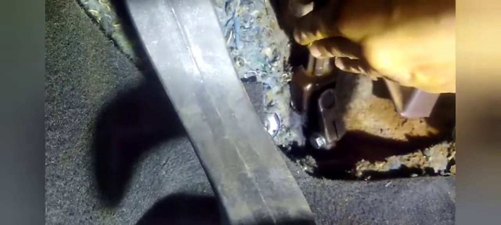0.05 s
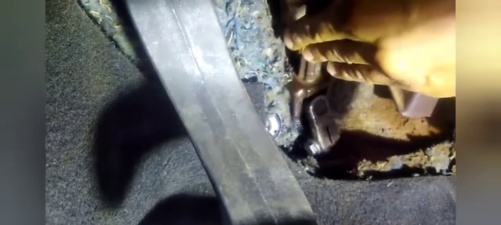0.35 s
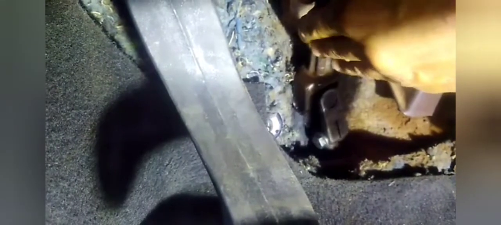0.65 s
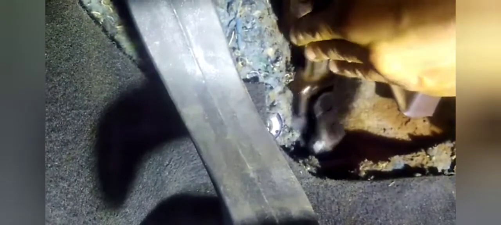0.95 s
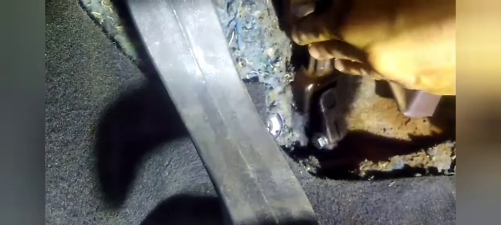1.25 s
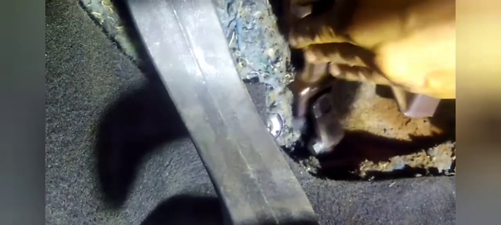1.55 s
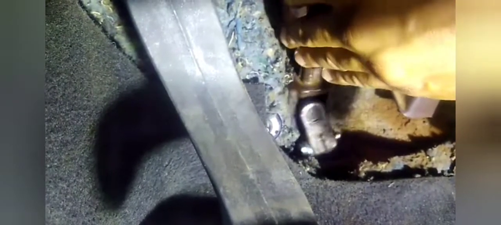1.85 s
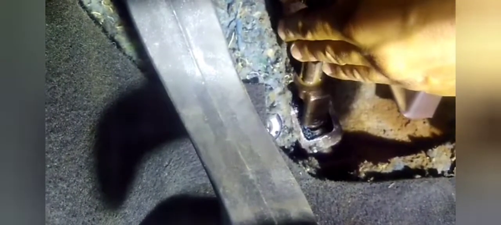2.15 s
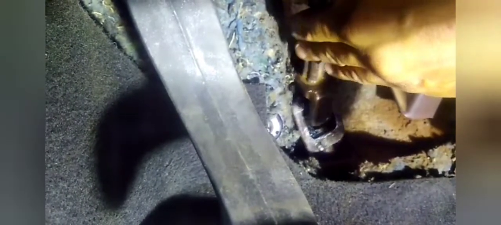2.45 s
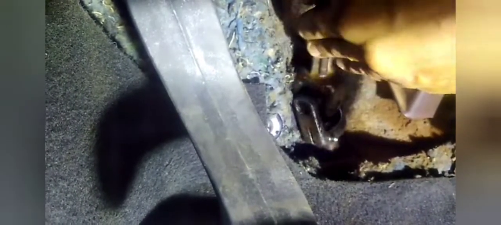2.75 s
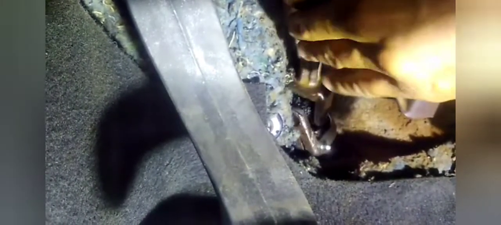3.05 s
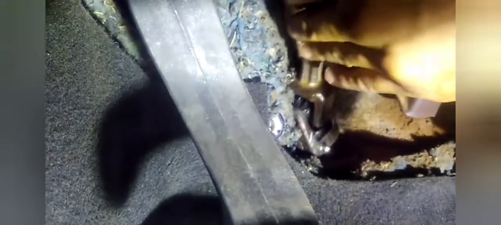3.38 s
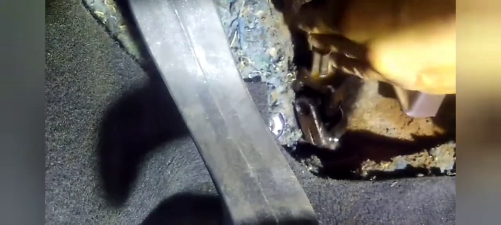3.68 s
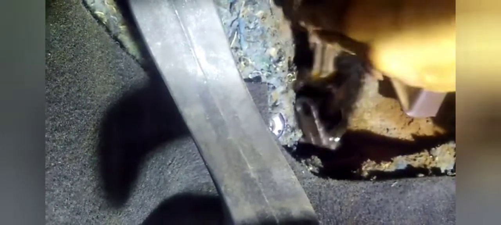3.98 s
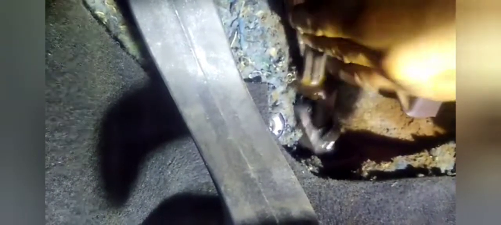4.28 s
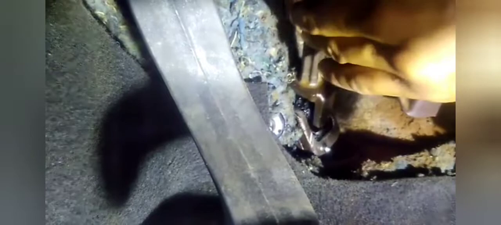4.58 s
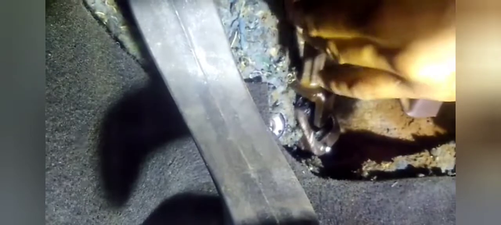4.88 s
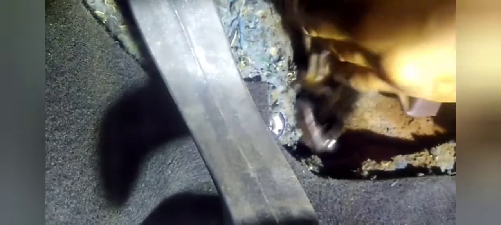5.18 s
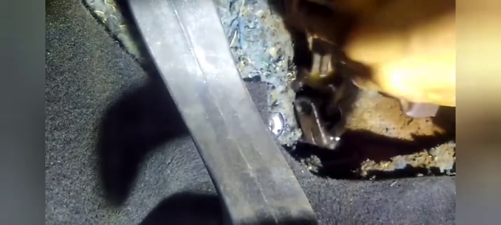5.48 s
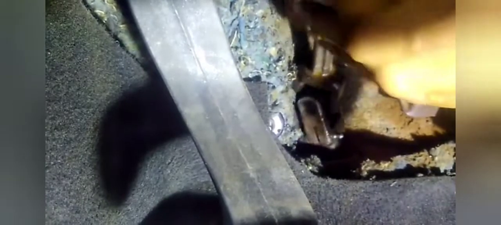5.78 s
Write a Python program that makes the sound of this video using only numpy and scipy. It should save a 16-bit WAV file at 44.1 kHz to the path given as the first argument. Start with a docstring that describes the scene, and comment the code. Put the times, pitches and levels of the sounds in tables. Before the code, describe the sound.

A worn steering box is rocked back and forth, heard close up in a car's footwell with a low cabin rumble throughout. For the first three seconds, dull, uneven knocks come roughly three times a second, each with a deep, slightly bouncing thump from the floor. The shaft rubs faintly between them, the linkage gives a tiny squeak near 2.2 seconds, and the trim creaks quietly around 2.5 seconds. From about 3 seconds the knocks grow harder and quicker, with bright metallic clacks and slight rattles from the column joint. They are loudest between 3.7 and 5 seconds, about five or six a second, alternating sharp cracks with hollower clunks, while the rumble swells a little. After about 5.3 seconds they soften into dull thumps again, with a brief faint squeak near 5.8 seconds.

```python
"""Dull knocks over a low cabin rumble: a worn steering box is rocked to and fro in a car's footwell.
At each reversal the gears cross their play and clunk, the column joint clacks a few ms later,
and the floor pan thumps and rebounds. The knocks grow hard and bright midway, then soften again.
Between them the shaft rubs in its bush; now and then the linkage squeaks faintly, and once the
trim creaks."""
import sys
import numpy as np
from scipy import signal
from scipy.fft import rfft, irfft
from scipy.io import wavfile
from scipy.ndimage import uniform_filter1d

SR = 44100
rng = np.random.default_rng(int(sys.argv[2]) if len(sys.argv) > 2 else 0)


def generate_wav(sig):
    """Save sig (samples, or channels by samples) to the path in sys.argv[1] as 16-bit PCM at SR."""
    pcm = np.round(np.clip(np.atleast_2d(sig).T, -1, 1) * 32767).astype(np.int16)
    wavfile.write(sys.argv[1], SR, pcm)


N = 261513
T = np.arange(N) / SR
FFT_SIZE = 16384
HZ = np.maximum(np.arange(FFT_SIZE // 2 + 1) * SR / FFT_SIZE, 1)

# likeness of left and right in the footwell: frequency_hz, correlation
COHERENCE = [(90, 1), (170, 1), (260, 0.41), (650, 0.8), (1000, 0.087), (3000, -0.11), (12000, 0.75)]
# load on the shaft, as a relative sound level: time_s, load_db
SHAFT_LOAD = [(0.0, -68), (1.02, -68.5), (1.52, -68), (1.93, -65.5), (2.94, -67.5), (4.14, -59),
              (5.63, -66.5), (5.76, -62.5), (5.93, -67)]
# spectra of the noises: frequency_hz, level_db
CABIN_RUMBLE = [(20, -31), (32, -23), (45, -42.5), (54, 12.5), (62, 14), (73, 2.5), (100, 0.5), (140, 2),
                (190, -29.5), (300, -54)]
FLOOR_SHUDDER = [(60, -30.5), (100, 6.5), (130, 3), (180, -21), (260, -12.5), (420, -42.5)]
AIR_HISS = [(1000, 19.5), (2500, -10), (4000, 7), (5500, 3), (7500, 6), (10000, -28), (15300, -22)]
SHAFT_GROAN = [(100, -13), (190, 14.5), (280, -4), (450, -2.5), (750, -5.5), (1200, -10), (2300, -14),
               (3300, -25.5), (6000, -32)]
BUSH_RUB = [(1200, 2.5), (2400, 0), (3500, -0.5), (5500, -2), (7800, -1), (9500, -4), (15000, -18)]
TRIM_SPECTRUM = [(120, -15), (170, 1), (205, 8.5), (250, -1), (320, -12.5), (900, -52)]
# swell of the trim's creak: time_s, level_db
TRIM_ENVELOPE = [(2.40, -69), (2.46, -49), (2.50, -42.5), (2.56, -45), (2.66, -82)]
# the shaft scraping in its bush: crest_s, half_length_s, level_db
BUSH_SCRAPES = [(1.903, 0.12, -68), (2.046, 0.031, -61.5), (2.553, 0.073, -66), (2.87, 0.081, -74),
                (5.92, 0.13, -69.5)]
# dry linkage squeaking: crest_s, half_length_s, pitch_hz, level_db
LINKAGE_SQUEAKS = [(0.495, 0.032, 2720, -71), (2.191, 0.026, 680, -57.5), (5.802, 0.018, 1366, -55),
                   (5.808, 0.02, 2340, -65), (5.83, 0.016, 1396, -46.5)]

# response of the body panels to a clunk: frequency_hz, gain_db
PANEL_RESPONSE = [(20, -23), (33, 2), (48, 1.5), (75, 10.5), (115, -14), (145, 13), (180, 1), (240, 3.5),
                  (440, -6), (750, -17), (1300, -33.5), (3000, -54)]
# hollow ring of the casing on the way back: pitch_hz, level_db, t60_s
CASING_MODES = [(435.6, -12, 0.16), (813, -10, 0.086), (908, -12, 0.075), (1019, -8, 0.085)]
# resonances of the column joint and of the box under each flank: frequency_hz, width_hz, level_db
JOINT_RESONANCES = [(3540, 210, 9.5), (4330, 130, -16), (4870, 170, -5), (5070, 180, -22), (5400, 110, -2),
                    (5950, 280, -9), (6800, 240, 10.5), (6800, 96, -12), (6900, 170, 8), (8000, 240, -25),
                    (7290, 150, 13.5), (7960, 660, 9.5)]
BOX_FORWARD_RESONANCES = [(239, 8.9, 12.5), (342, 8.5, 7.5), (418, 84, 5.5), (517, 20, 7), (658, 173, 5.5),
                          (770, 23, -27), (1355, 120, -3.5), (1770, 23, -42), (1810, 42, -22),
                          (2460, 230, -6.5), (2950, 20, -42)]
BOX_BACK_RESONANCES = [(294, 39, 10.5), (417, 35, 7), (482, 38, 7.5), (796, 123, 8.5), (990, 70, -19),
                       (950, 23, 4), (1260, 48, -32), (1870, 60, -3.5), (2270, 160, -5), (2500, 33, -66)]
# their beds of dense modes, for each direction of turn: frequency_hz, level_db
JOINT_FORWARD_BED = [(2800, -6), (4000, -20), (5000, 0.5), (6500, -6.5), (8200, 3), (8900, -21),
                     (11000, -11.5), (13000, -19), (15500, -18)]
JOINT_BACK_BED = [(2800, 4), (4200, 8), (6000, 5.5), (7500, 10.5), (9000, 2.5), (11000, -5.5), (13000, -10),
                  (15500, -43)]
BOX_FORWARD_BED = [(150, -4), (300, -6), (480, -33.5), (800, -1), (1000, -14), (1200, -32), (1500, -11),
                   (2500, -19.5), (3400, -18)]
BOX_BACK_BED = [(150, -8), (300, -2), (560, 2.5), (1000, -25), (1450, -8), (2200, -26), (3400, -11)]
# where joint and box sit between the ears: frequency_hz, left_minus_right_db
JOINT_BALANCE = [(2500, 13.5), (4300, -6), (5200, -8), (6300, -14.5), (7200, -11), (8200, -6), (9200, -3.5),
                 (14000, 0)]
BOX_BALANCE = [(200, -1), (700, 0), (1100, 0), (1450, -5), (1850, 0), (2400, -6), (3200, -4)]

# slack teeth nudging each other softly: start_s, level_db
TOOTH_NUDGES = [(1.483, -40.5), (2.961, -43.5), (4.386, -37.5), (5.107, -41), (5.304, -41), (5.429, -32.5)]
# wheel turned forward, the teeth slam and bounce once, the floor pan heaves:
# start_s, gear_db, hardness_db, joint_db, bounce_after_s, bounce_loss_db,
# floor_lag_s, floor_db, floor_pitch_hz, rebound_every_s, rebound_loss_db
FORWARD_SLAMS = [(0.002, -38.5, 0.5, -41, 0.021, 19, 0.017, -32.5, 134, 0.038, 22),
                 (0.519, -27.5, -37, -52, 0.064, 12, 0.026, -20.5, 114.5, 0.061, 10),
                 (1.168, -38, -23, -50.5, 0.047, -4, 0.073, -27.5, 115, 0.05, 16),
                 (1.876, -38, -19, -48, 0.089, 2, 0.03, -18, 101.7, 0.06, 5.5),
                 (2.425, -41, -22, -57, 0.06, 7, 0.02, -25, 102, 0.06, 3.5),
                 (2.794, -34.5, -6, -45, 0.018, 14, 0.0153, -26.5, 102.7, 0.032, 0.5),
                 (3.318, -22.5, 5.5, -20, 0.04, 27.5, 0.015, -19.5, 116, 0.05, 8.5),
                 (3.715, -17, 4, -12.5, 0.038, 17.5, 0.018, -18, 124, 0.048, 3.5),
                 (4.083, -17, 4.5, -11, 0.032, 12.5, 0.017, -18, 124, 0.049, 2),
                 (4.435, -17.5, 3.5, -11, 0.032, 18, 0.01764, -18.5, 123, 0.048, 2),
                 (4.796, -18, 4.5, -14, 0.024, 33, 0.017, -19.5, 124.5, 0.05, 3),
                 (5.166, -25.5, 0.5, -31, 0.024, 43, 0.027, -19.5, 106.8, 0.045, 6.5),
                 (5.497, -29, -5, -42, 0.007, 3.5, 0.03, -16, 102.7, 0.055, 6.5),
                 (5.856, -41.5, -11, -58, 0.021, 24, 0.0197, -36, 110, 0.05, 12)]
# wheel turned back, the other flank touches, slides and seats, the floor pan heaves:
# start_s, touch_db, slide_s, seating_db, hardness_db, joint_db,
# floor_lag_s, floor_db, floor_pitch_hz, rebound_every_s, rebound_loss_db
BACK_SEATINGS = [(0.255, -30, 0.018, -33.5, 0, -43, 0.015, -17, 111.3, 0.046, 5),
                 (0.916, -26, 0.024, -28.5, -10, -42, 0.0092, -18.5, 115.6, 0.047, 4),
                 (1.527, -28, 0.015, -29.5, -5.5, -47, 0.016, -17, 111.6, 0.056, 9),
                 (3.053, -33.5, 0.02, -22, 6, -22.5, 0.022, -19.5, 105.6, 0.029, -1),
                 (3.519, -37, 0.026, -25.5, 9.5, -22.5, 0.049, -20, 113.2, 0.063, 13),
                 (3.88, -32, 0.025, -21, 3, -24.5, 0.053, -21, 109.7, 0.04, 10),
                 (4.239, -32.5, 0.018, -19.5, 0.5, -21, 0.031, -19, 103, 0.062, 11),
                 (4.6, -33.5, 0.019, -21.5, 4.5, -23.5, 0.024, -21.5, 103, 0.0335, 2.5),
                 (4.953, -29.5, 0.02, -20, 0.5, -24.5, 0.033, -19.5, 106.4, 0.06, 5),
                 (5.336, -30, 0.023, -21, -2, -29, 0.042, -21.5, 109.6, 0.033, 3.5),
                 (5.661, -36, 0.026, -33, -22, -48.5, 0.023, -23.5, 98, 0.039, 5.5)]


def from_db(db):
    """Amplitude grows tenfold for every 20 dB."""
    return 10 ** (np.asarray(db) / 20)


def over_time(points):
    """Linear interpolation of a curve at every sample."""
    return np.interp(T, *np.transpose(points))


def over_hz(points):
    """Linear interpolation of a curve over log frequency."""
    hz, value = np.transpose(points)
    return np.interp(np.log(HZ), np.log(hz), value)


def drift(size, rate_hz):
    """Random modulation: unit Gaussian values joined by straight lines."""
    count = int(size * rate_hz / SR) + 2
    return np.interp(np.arange(size) * rate_hz / SR, np.arange(count), rng.standard_normal(count))


def add(track, start_s, sound):
    """Superposition: a short sound sums into a track."""
    i = max(round(start_s * SR), 0)
    track[..., i:i + sound.shape[-1]] += sound[..., :max(N - i, 0)]


def filtered(x, response):
    """A linear system convolves its input with its impulse response."""
    return signal.oaconvolve(np.atleast_2d(x), np.atleast_2d(response), axes=1)[:, :N]


def colour(x, gain):
    """Minimum-phase filtering: a causal response of the given shape, with unit gain for white noise."""
    half = FFT_SIZE // 2
    cepstrum = irfft(np.log(gain / np.sqrt(np.mean(gain ** 2)) + 1e-5))
    cepstrum[..., 1:half] *= 2
    cepstrum[..., half + 1:] = 0
    return filtered(x, irfft(np.exp(rfft(cepstrum)))[..., :half])


def spread(pair):
    """Partial coherence: two independent signals become left and right, most alike in the bass."""
    alike = np.clip(over_hz(COHERENCE), -.99, .995)
    mid, side = colour(pair, np.sqrt([1 + alike, 1 - alike]))
    return np.array([mid + side, mid - side]) / np.sqrt(2)


def noise(spectrum):
    """Spectral shaping of white noise gives a stereo noise of rms near 1."""
    return colour(spread(rng.standard_normal((2, N))), from_db(over_hz(spectrum)))


def under_load(light_db, db_per_db=1):
    """Power law: a gain that is light_db at light load and grows with the load on the shaft."""
    light_load_db = -66
    return from_db(light_db + db_per_db * (over_time(SHAFT_LOAD) - light_load_db))


def cabin_background():
    """Random vibration: cabin rumble and floor shudder follow the load, beneath a steady hiss of air."""
    rumble = under_load(-39, db_per_db=0.89) * noise(CABIN_RUMBLE)
    shudder = under_load(-51.5, db_per_db=0.57) * noise(FLOOR_SHUDDER)
    return rumble + shudder + from_db(-76) * noise(AIR_HISS)


def shaft_friction():
    """Sliding friction in the bush: an uneven groan that grows with load, and a gritty rub."""
    unevenness = from_db(2 * drift(N, rate_hz=60))
    grit = from_db(4 * drift(N, rate_hz=700))
    groan = under_load(-59) * unevenness * noise(SHAFT_GROAN)
    scrapes = sum(from_db(db) * np.exp(-((T - s) / half_s) ** 2) for s, half_s, db in BUSH_SCRAPES)
    rub = (from_db(-77) + scrapes) * grit * noise(BUSH_RUB)
    return groan + rub


def trim_creak():
    """Amplitude modulation: a low band of noise swells once as the pedal-box trim creaks."""
    db = over_time(TRIM_ENVELOPE)
    return from_db(db) * (db > db[0]) * noise(TRIM_SPECTRUM)


def linkage_squeaks(waver=0.039):
    """Stick-slip oscillation in the dry linkage gives short, unsteady tones that swell and fade."""
    out, t = np.zeros(N), T[:SR // 5] - .1
    for crest_s, half_s, hz, db in LINKAGE_SQUEAKS:
        pitch_hz = hz * (1 + waver * drift(len(t), rate_hz=450))
        envelope = from_db(db) * np.exp(-(t / half_s) ** 2)
        add(out, crest_s + t[0], envelope * np.sin(2 * np.pi * np.cumsum(pitch_hz) / SR))
    return out


def gear_contacts(nudge_t60=0.03, slam_t60=0.032, touch_t60=0.075, seating_t60=0.059):
    """Backlash lets the teeth collide. Rows: start_s, level_db, hardness_db, t60_s, joint_db, back."""
    rows = [(s, db, -26, nudge_t60, db - 26, 0) for s, db in TOOTH_NUDGES]
    for s, db, hardness_db, joint_db, bounce_s, loss_db, *_ in FORWARD_SLAMS:
        rows.append((s, db, hardness_db, slam_t60, joint_db, 0))
        edge_db = hardness_db + 2   # a bounce catches only the tooth edges
        rows.append((s + bounce_s, db - loss_db, edge_db, slam_t60, joint_db - 0.88 * loss_db, 0))
    for s, touch_db, slide_s, seating_db, hardness_db, joint_db, *_ in BACK_SEATINGS:
        touch = (0, touch_db, touch_t60)
        seat = (slide_s, seating_db, seating_t60)
        settle = (slide_s + 0.045, seating_db - 21, touch_t60)
        for after_s, db, t60 in (touch, seat, settle):
            rows.append((s + after_s, db, hardness_db, t60, joint_db + db - seating_db, 1))
    return rows


def floor_thumps(rise_s=0.01286, sag=0.2, rebound_pitch_ratio=0.96, cabin_hz=59):
    """Damped plate vibration: the floor pan heaves, rebounds twice and drives a mode of the cabin air."""
    pan, age = np.zeros(N), T[:SR // 6] / rise_s
    envelope = (age * np.exp(1 - age)) ** 1.34
    phase_per_hz = 2 * np.pi * np.cumsum(1 + sag * (np.exp(1 - age) - 1)) / SR   # the pitch sags
    knocks = [(s, *row[-5:]) for s, *row in FORWARD_SLAMS]
    knocks += [(s + slide_s, *row[-5:]) for s, _, slide_s, *row in BACK_SEATINGS]
    for s, lag_s, db, hz, rebound_s, loss_db in knocks:
        for k in range(3):
            crest_s = s + lag_s + k * rebound_s
            swing = np.sin(hz * rebound_pitch_ratio ** k * phase_per_hz)
            add(pan, crest_s - rise_s, from_db(db - k * loss_db) * envelope * swing)
    boom = signal.lfilter(*signal.iirpeak(cabin_hz, Q=9, fs=SR), pan)
    return from_db(-0.5) * pan + from_db(-9) * boom


def mount_thuds():
    """Mass on a spring: each blow jolts the box on its mounting, weaker and longer on the way back."""
    out, t = np.zeros(N), T[:SR // 16]

    def swing(rise_s, pitch_hz, level_db):
        envelope = (t / rise_s * np.exp(1 - t / rise_s)) ** 2
        return -from_db(level_db) * envelope * np.sin(2 * np.pi * pitch_hz * t)

    forward = swing(rise_s=0.0031, pitch_hz=255, level_db=-6)
    backward = swing(rise_s=0.0069, pitch_hz=275, level_db=-13)
    for s, db, *_, back in gear_contacts():
        add(out, s, from_db(db) * (backward if back else forward))
    return out


def casing_ring(vary_db=3.5):
    """Free vibration: blows on the return flank ring the casing's low modes, each in its own mix."""
    out, t = np.zeros(N), T[:SR // 5]
    modes = np.array([(-1) ** k * from_db(db - 60 * t / t60) * np.sin(2 * np.pi * hz * t)
                      for k, (hz, db, t60) in enumerate(CASING_MODES)])
    for s, db, hardness_db, *_, back in gear_contacts():
        ring = from_db(vary_db * rng.standard_normal(len(modes))) @ modes
        softness_db = 1.1 * min(hardness_db, 0)   # soft blows barely ring it
        add(out, s, back * from_db(db - 6.5 + softness_db) * ring)
    return out


def steel_response(resonances, bed, balance, bed_db, low_hz, high_hz):
    """Modal summation: a greased steel part's gain per ear, damped peaks over a bed of dense modes."""
    top_db = max(db for _, _, db in resonances)
    power = from_db(over_hz(bed) + bed_db) ** 2
    for hz, width_hz, db in resonances:
        damped_width_hz = max(width_hz, min(hz / 25, 130))
        power += from_db(db - top_db) ** 2 / (1 + (2 * (HZ - hz) / damped_width_hz) ** 2)
    band_loss = (1 + (low_hz / HZ) ** 8) * (1 + (HZ / high_hz) ** 20)
    return np.sqrt(power / band_loss) * from_db(over_hz(balance) * [[.5], [-.5]])


def scattered_blow(t60, path, fresh_share, tail_db, tail_t60, rise_s, chatter_db):
    """Scattering in the linkage spreads a blow in time but keeps its energy even over frequency."""
    t = T[:path.shape[1]]
    grain = np.sqrt(1 - fresh_share) * path + np.sqrt(fresh_share) * rng.standard_normal(path.shape)
    chatter = from_db(chatter_db * drift(len(t), rate_hz=500))
    seating = 1 - np.exp(-t / rise_s)
    cabin_tail = from_db(tail_db - 60 * t / tail_t60)
    envelope = seating * (from_db(-60 * t / t60) + cabin_tail)
    spectrum = rfft(grain * chatter * envelope, FFT_SIZE)
    power = uniform_filter1d(np.abs(spectrum) ** 2, size=160, axis=1)
    return irfft(spectrum * np.sqrt(np.sum(envelope ** 2) / power))[:, :len(t)]


def loose_ticks(per_s, level_db, t60):
    """A Poisson process: slack parts touch faintly at random, more strongly under load."""
    touches = rng.random(N) < per_s / SR
    strength = under_load(level_db) * from_db(rng.uniform(-12, 0, N))
    t = T[:SR // 10]
    tick = rng.standard_normal((2, len(t))) * from_db(-60 * t / t60)
    return filtered(touches * strength, tick)


def joint_snaps(forward_lag_s=0.0065, back_lag_s=0.0052, forward_t60=0.03, back_t60=0.031):
    """The joint's clearance closes after that of the gears. Rows: start_s, level_db, t60_s, back."""
    rows = []
    for s, *_, joint_db, back in gear_contacts():
        if back:   # the loose joint snaps twice
            rattle_s = 0.016 * rng.uniform(.7, 1.3)
            rows.append((s + back_lag_s, joint_db, back_t60, 1))
            rows.append((s + back_lag_s + rattle_s, joint_db - 19, back_t60, 1))
        else:
            rows.append((s + forward_lag_s, joint_db, forward_t60, 0))
    return rows


def joint_clacks():
    """Brief steel-on-steel impacts excite high modes: a bright crack forward, a grittier clatter back."""
    blows = np.zeros((2, 2, N))   # direction, ear, sample
    paths = rng.standard_normal((2, 2, SR // 5))
    crack = np.array([[.3], [1.5]]) * np.exp(-T[:SR // 5] / 0.00032)   # the right side faces the joint
    for s, db, t60, back in joint_snaps():
        if back:
            blow = scattered_blow(t60, paths[1], fresh_share=0.31, tail_db=-11.5, tail_t60=0.078,
                                  rise_s=0.00062, chatter_db=5.5) * (1 + 0.97 * crack)
        else:
            seating_s = .00015 if db > -20 else .0018   # only a hard slam seats at once
            blow = scattered_blow(t60, paths[0], fresh_share=0.13, tail_db=-28, tail_t60=0.16,
                                  rise_s=seating_s, chatter_db=0.5) * (1 + crack)
        add(blows[back], s, from_db(db) * blow)
    blows[0] += loose_ticks(per_s=23, level_db=-50, t60=.03)
    forward = steel_response(JOINT_RESONANCES, JOINT_FORWARD_BED, JOINT_BALANCE,
                             bed_db=-4.5, low_hz=2300, high_hz=16800)
    backward = steel_response(JOINT_RESONANCES, JOINT_BACK_BED, JOINT_BALANCE,
                              bed_db=6, low_hz=2200, high_hz=17000)
    return from_db(-8.5) * colour(blows[0], forward) + from_db(-7) * colour(blows[1], backward)


def gear_clunks():
    """Impact excitation: colliding teeth ring the box and the body panels; light blows are duller."""
    blows, panel_drive = np.zeros((2, 2, N)), np.zeros((2, N))
    paths = rng.standard_normal((2, 2, SR // 3))
    lowpass = signal.butter(1, 1000, fs=SR)
    for s, db, hardness_db, t60, _, back in gear_contacts():
        blow = scattered_blow(t60, paths[back], fresh_share=0.55, tail_db=-26, tail_t60=0.17,
                              rise_s=.0025 if back else .0008, chatter_db=-4.5)
        blow[0, 0] -= 3 if back else 6   # the first impact
        dull = signal.lfilter(*lowpass, blow)
        treble = from_db(hardness_db + 0.16 * (db + 33)) * (blow - dull)
        add(blows[back], s, from_db(db) * (dull + treble))
        boom = scattered_blow(0.22, paths[back], fresh_share=0.72, tail_db=-19.5, tail_t60=0.46,
                              rise_s=0.0013, chatter_db=-1)
        add(panel_drive, s, from_db(db) * boom)
    blows[0] += signal.lfilter(*lowpass, loose_ticks(per_s=5.1, level_db=-53.5, t60=0.034))
    forward = steel_response(BOX_FORWARD_RESONANCES, BOX_FORWARD_BED, BOX_BALANCE,
                             bed_db=-7.5, low_hz=199, high_hz=2800)
    backward = steel_response(BOX_BACK_RESONANCES, BOX_BACK_BED, BOX_BALANCE,
                              bed_db=-7.5, low_hz=202, high_hz=2980)
    box = from_db(-4) * colour(spread(blows[0]), forward)
    box += from_db(-3) * colour(spread(blows[1]), backward)
    panels = colour(spread(panel_drive), from_db(over_hz(PANEL_RESPONSE)))
    return box + from_db(-5.5) * panels


def scene():
    """Superposition: the pressures of all sources add in the footwell."""
    knocks = gear_clunks() + casing_ring() + mount_thuds() + joint_clacks() + floor_thumps()
    return knocks + shaft_friction() + cabin_background() + trim_creak() + linkage_squeaks()


def record(dry):
    """Band limiting: a steep elliptic low-pass removes the highest treble."""
    cutoff_hz = 15900
    return signal.sosfilt(signal.ellip(10, .1, 80, cutoff_hz, fs=SR, output="sos"), dry)


dry = scene()
out = record(dry)
generate_wav(out)
```